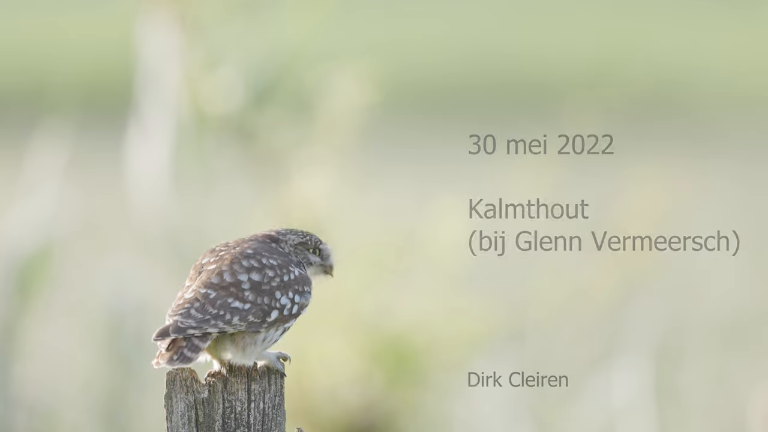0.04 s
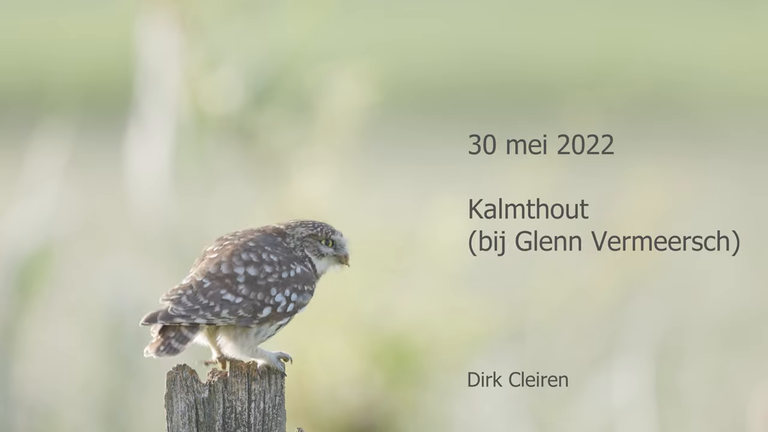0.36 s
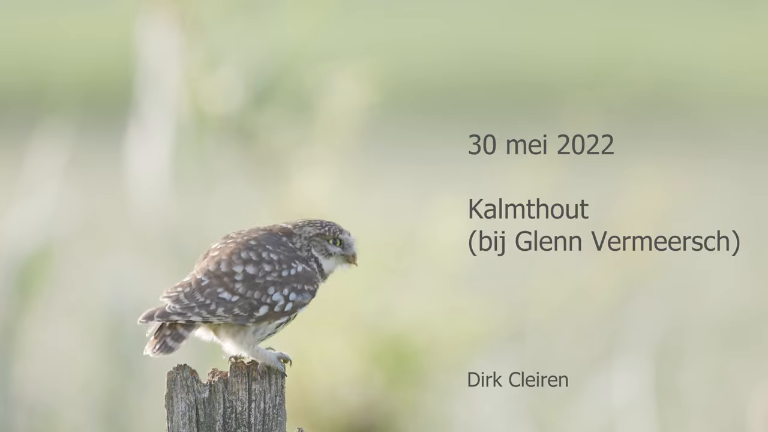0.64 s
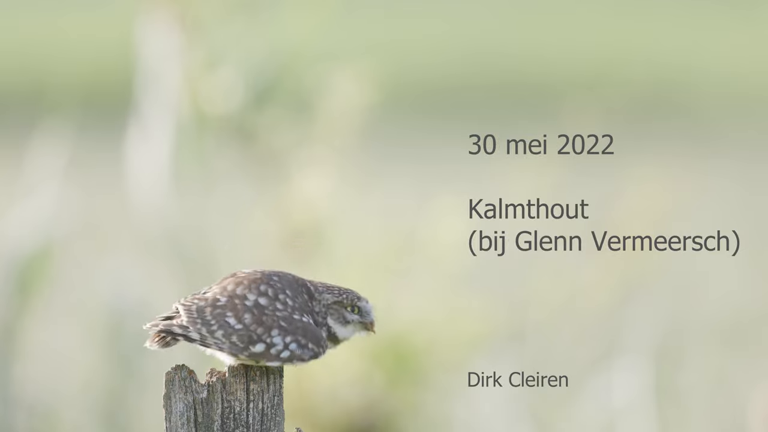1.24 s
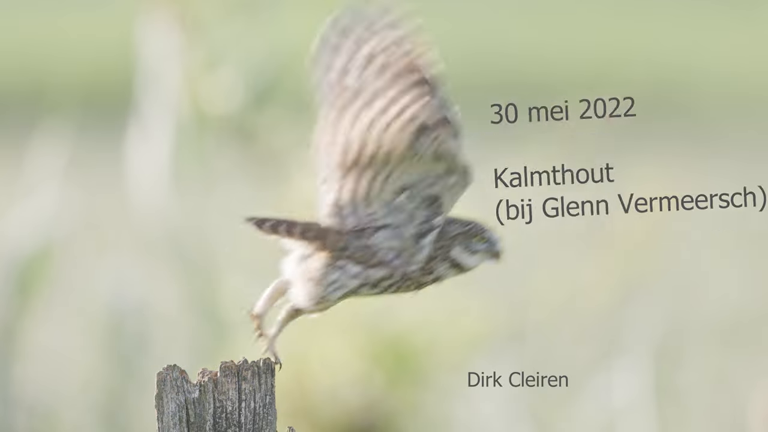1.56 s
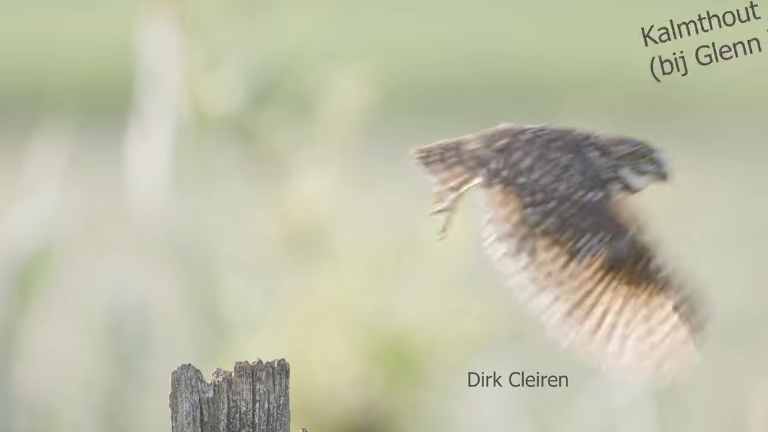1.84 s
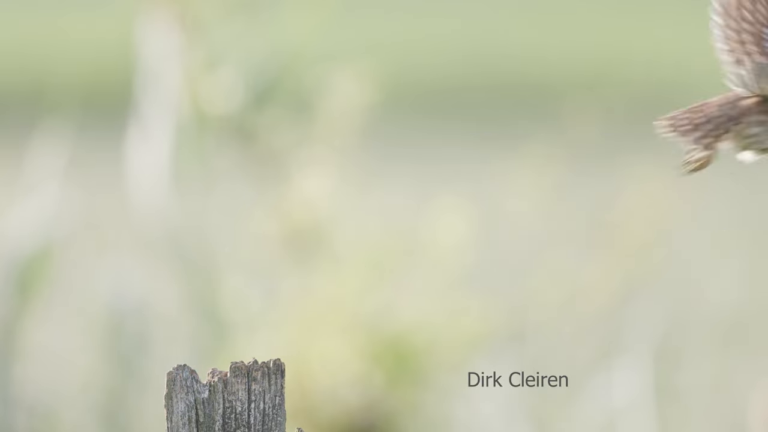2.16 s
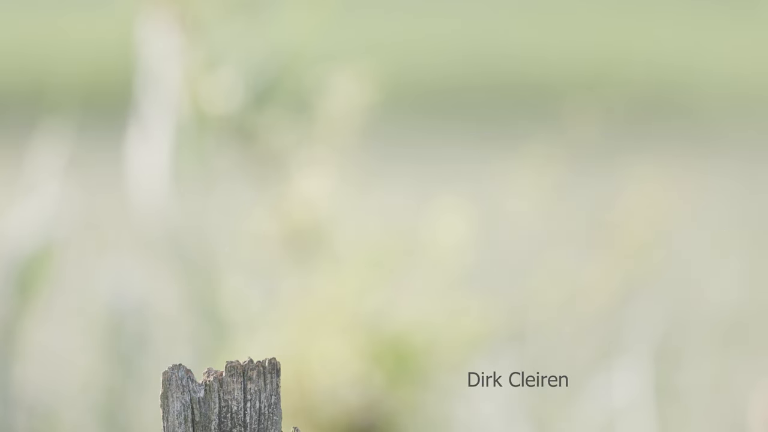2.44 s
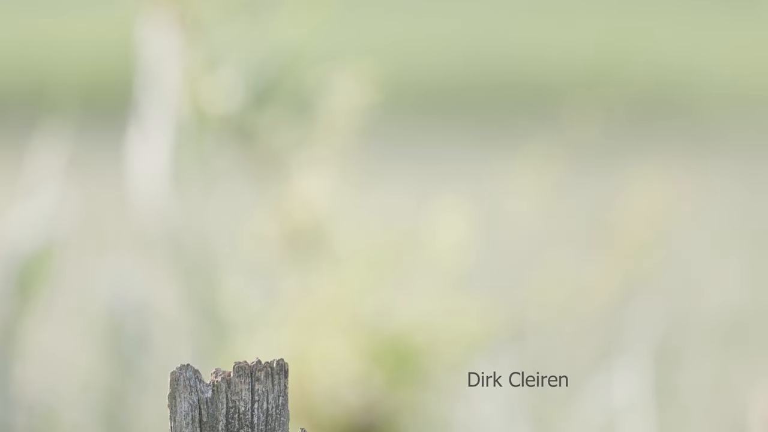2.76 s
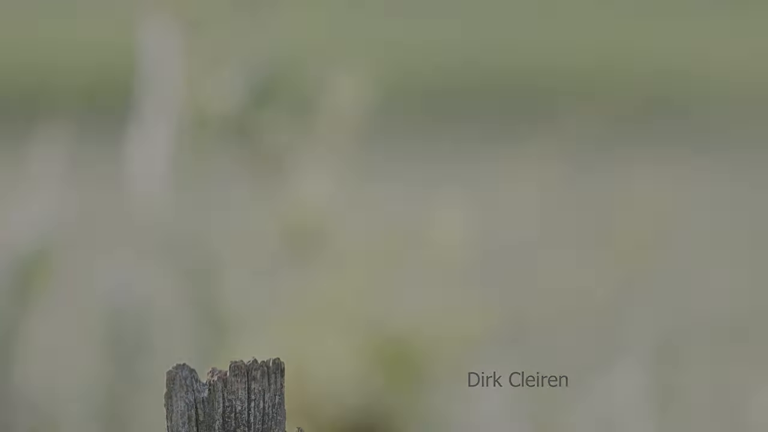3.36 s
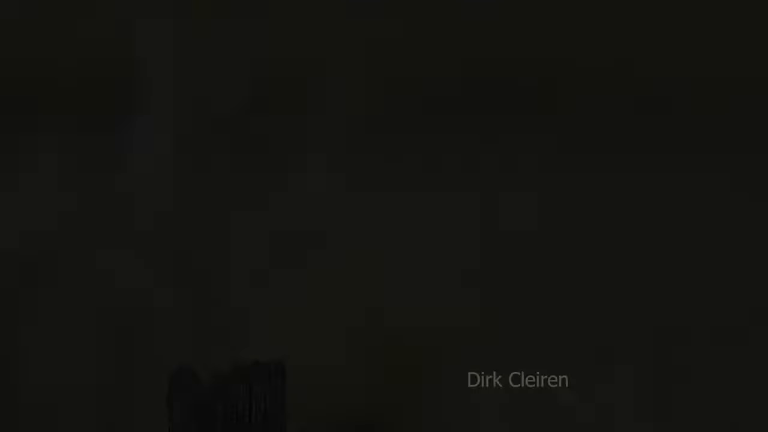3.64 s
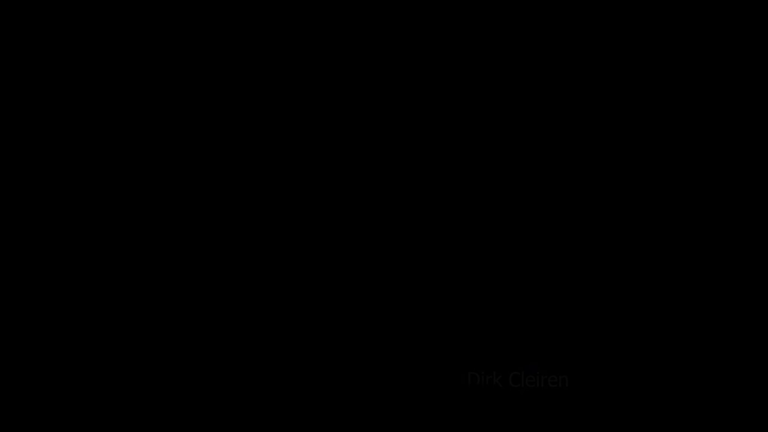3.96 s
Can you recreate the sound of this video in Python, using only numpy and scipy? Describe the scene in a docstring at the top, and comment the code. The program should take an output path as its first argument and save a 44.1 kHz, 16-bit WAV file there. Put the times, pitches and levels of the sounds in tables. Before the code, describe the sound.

Soft, repeated hooting bird calls across a meadow, with brief wing flaps and a deep hum.

```python
"""Distant birds call back and forth in soft, arched hoots near 1.2 kHz, across an open meadow.
Slurred and level notes sound between; all are nearly pure tones, echoed by the field.
A small owl flaps off a fence post with puffs of air and feather rustle, and a smaller bird chirps twice.
A few dull taps sound here and there. Under it all lie a deep steady hum, a far rumble and faint hiss;
everything fades out at the end."""
import sys
import numpy as np
from scipy import signal
from scipy.fft import rfft, irfft
from scipy.io import wavfile

SR = 44100
rng = np.random.default_rng(int(sys.argv[2]) if len(sys.argv) > 2 else 0)


def int16_out(signal):
    """Quantize to a 16-bit WAV file."""
    q = np.round(np.clip(np.atleast_2d(signal).T, -1, 1) * 32767)
    wavfile.write(sys.argv[1], SR, q.astype(np.int16))


N = 176400
TIME = np.arange(N) / SR

# arched hoots: (start [s], length [s], top pitch [Hz], arch depth [Hz], level [dB])
HOOT_NOTES = [(.088, 0.074, 1210, 101, -50.5), (0.215, 0.11, 1230, 150, -53), (.38, 0.088, 1189, 122, -53),
              (0.579, .115, 1235, 215, -49.5), (0.793, 0.12, 1226, 202.5, -49),
              (0.995, 0.11, 1210, 161, -46.5), (1.177, 0.098, 1216, 158, -48.5),
              (1.343, 0.092, 1206, 153, -47), (1.536, 0.09, 1204, 123, -43),
              (1.757, 0.096, 1218, 125, -42.5), (1.955, 0.103, 1194, 182, -42.5),
              (2.121, 0.11, 1193, 171.5, -43.5), (2.301, 0.096, 1161, 160, -43.5),
              (3.712, 0.1015, 1193, 157, -42.5), (3.893, 0.11, 1207, 108, -44)]


def hoots():
    """Each hoot rises in one arch and falls back less far than it rose."""
    fall_share = 0.82
    arches = [(start, length, top - depth, top, top - fall_share * depth, db)
              for start, length, top, depth, db in HOOT_NOTES]
    return sing(arches, attack_s=0.03, release_s=0.019,
                waver_share=0.0083, flutter_db=1.62, drift_hz=66, skew=0.98)


# slurred calls, one curve each: (time [s], pitch [Hz], level [dB])
SLUR_CURVES = [
    [(.772, 1155, -58), (.79, 1320, -59), (.81, 1476, -54.5), (.835, 1459, -53), (.86, 1262, -53),
     (.885, 1200, -58)],
    [(.912, 1031, -53.5), (.955, 1234, -46), (.98, 1283, -47), (1.0, 1352, -44), (1.028, 1557, -57),
     (1.055, 1400, -62)],
    [(1.492, 1680, -61), (1.51, 1420, -60), (1.53, 1287, -50.5), (1.57, 1210, -56)],
    [(1.998, 1216, -56), (2.028, 1450, -59), (2.055, 1394, -52), (2.09, 1167, -52)],
    [(2.078, 1164, -48.5), (2.12, 1200, -43.5), (2.15, 1230, -49.5), (2.19, 1402, -48.5),
     (2.215, 1280, -59)],
    [(3.286, 1027, -49), (3.3, 1092, -49), (3.315, 1396, -63), (3.33, 1463, -60), (3.352, 1347, -49.5),
     (3.38, 1127, -48), (3.41, 920, -54)],
    [(3.438, 1064, -43.5), (3.46, 1136, -42), (3.505, 1227, -42), (3.525, 1276, -43), (3.548, 1315, -42.5),
     (3.575, 1450, -52), (3.61, 1564, -53)],
]


def slurs():
    """Wide, slightly rough glides, each sung in one breath."""
    waver_share, flutter_db, drift_hz = 0.014, 1.5, 130
    out, waver, flutter = np.zeros(N), drift(drift_hz), drift(drift_hz)
    for call in SLUR_CURVES:
        times, hz, db = np.transpose(call)
        on = (TIME >= times[0]) & (TIME < times[-1])
        pitch_hz = np.interp(TIME[on], times, hz) * (1 + waver_share * waver[on])
        level_db = np.interp(TIME[on], times, db) + flutter_db * flutter[on]
        out[on] += voice(pitch_hz, level_db, TIME[on] - times[0], attack_s=0.005, release_s=0.016)
    return out


# whistles: (start [s], length [s], first pitch [Hz], middle pitch [Hz], last pitch [Hz], level [dB])
WHISTLE_NOTES = [(-.02, 0.11, 1167, 1168, 1130, -53), (.305, 0.13, 1163, 1154, 1140, -56),
                 (.5, 0.075, 1525, 1553, 1500, -64), (1.2, 0.083, 1510, 1540, 1520, -62),
                 (1.63, 0.17, 1180, 1172, 1175, -52.5), (1.855, 0.085, 1505, 1530, 1505, -61),
                 (2.215, 0.053, 1170, 1166, 1175, -59), (2.385, 0.18, 1172, 1190, 1150, -61),
                 (2.48, 0.068, 1854, 1805, 1816, -67), (2.555, 0.087, 1428, 1467, 1505, -69),
                 (2.635, 0.074, 1540, 1540, 1530, -65), (2.645, 0.061, 1144, 1170, 1160, -62.5),
                 (3.425, 0.2, 1530, 1620, 1573, -60.5), (3.455, .062, 2070, 2200, 2320, -67),
                 (3.555, 0.18, 1235, 1162, 1160, -49.5)]


def whistles():
    """Birds near and far hold almost level notes; a faint one near 2.65 s is an echo of an earlier call."""
    return sing(WHISTLE_NOTES, attack_s=0.02, release_s=0.013,
                waver_share=0.0051, flutter_db=2, drift_hz=66)


# chirps: (start [s], length [s], first pitch [Hz], middle pitch [Hz], last pitch [Hz], level [dB])
CHIRP_NOTES = [(2.69, 0.014, 1860, 2260, 2500, -61), (2.729, 0.021, 1730, 2317, 2420, -56.5),
               (2.727, .018, 2500, 2630, 2640, -66), (2.755, 0.015, 1750, 2070, 2220, -60),
               (2.754, 0.014, 2450, 2390, 2350, -59), (2.844, 0.0136, 1830, 2400, 3120, -67),
               (2.857, .02, 1760, 2370, 2600, -56), (2.875, 0.035, 2890, 2974, 2920, -63),
               (2.907, 0.023, 2800, 2800, 2900, -58), (2.927, 0.0166, 1900, 2160, 2270, -54.5),
               (2.928, 0.02, 2600, 2570, 2540, -62), (2.949, 0.0081, 1880, 2040, 2270, -66)]


def chirps():
    """A smaller bird sings two clusters of quick, raspy, mostly rising notes."""
    return sing(CHIRP_NOTES, attack_s=0.0037, release_s=0.003,
                waver_share=0.02, flutter_db=4, drift_hz=310)


# hoarse moments: (centre [s], half length [s], level [dB])
RASP_BURSTS = [(0.784, 0.008, -52.5), (.83, .025, -58.5), (1.033, .02, -55.5), (1.535, 0.012, -55),
               (3.298, 0.0066, -50), (3.431, 0.0084, -50), (3.717, 0.0061, -45.5)]
# rasp spectrum: (frequency [Hz], density [dB])
RASP_SPECTRUM = [(600, -28), (900, -5), (1050, 13), (1220, -20), (1400, -6), (2200, -19), (5000, -52)]


def rasps():
    """Some calls turn hoarse: brief narrow-band noise near their pitch."""
    return swells(RASP_BURSTS) * noise(RASP_SPECTRUM)


# wing strokes: (centre [s], half length [s], puff [dB], rustle [dB])
WING_STROKES = [(1.155, 0.028, -55.5, -72), (1.498, .009, -61, -65), (1.563, 0.045, -56, -63.5),
                (1.731, 0.0074, -56, -61), (1.75, 0.013, -53.5, -76), (1.838, 0.023, -60.5, -61),
                (1.992, 0.063, -56.5, -63.5)]
# air puff, feather rustle and downstroke spectra: (frequency [Hz], density [dB])
PUFF_SPECTRUM = [(100, -27), (200, -16.5), (350, -3), (500, -5), (800, -4), (1100, -7), (1500, -15),
                 (3000, -21), (12000, -45)]
RUSTLE_SPECTRUM = [(300, -19), (1200, 4), (2100, 9), (3200, -7.5), (6000, -12), (12000, -35.5)]
THUMP_SPECTRUM = [(100, -18), (172, 3.5), (260, -7), (400, -13.5), (900, -43), (10000, -80)]


def owl_wings():
    """Each stroke pushes a soft puff of air and brushes the feathers; the first full one also thumps."""
    thump = swell(centre_s=1.772, half_s=0.04, db=-44.5) * noise(THUMP_SPECTRUM)
    puff = swells(WING_STROKES) * noise(PUFF_SPECTRUM)
    rustle = swells(WING_STROKES, db_column=3) * noise(RUSTLE_SPECTRUM)
    flicker_db = 2 * drift(70)
    return puff + rustle * from_db(flicker_db) + thump


# taps: (centre [s], half length [s], body [dB], brush [dB])
TAP_HITS = [(1.025, .008, -58, -77), (1.546, .005, -51, -70), (1.718, 0.0069, -52, -74),
            (2.205, 0.0089, -55, -72), (2.396, 0.009, -49, -61), (2.872, 0.009, -54, -75),
            (2.964, 0.02, -55, -80), (3.066, 0.013, -52, -64), (3.166, 0.011, -57.5, -64),
            (3.536, .006, -50, -72), (3.73, 0.013, -51.5, -72)]
# tap body spectrum: (frequency [Hz], density [dB])
TAP_SPECTRUM = [(100, -25), (350, -8), (550, -7.5), (800, 2), (1100, -11.5), (1500, -15), (3000, -21.5),
                (12000, -52)]


def taps():
    """Faint dull taps, some with a brush of treble."""
    body = swells(TAP_HITS) * noise(TAP_SPECTRUM)
    brush = swells(TAP_HITS, db_column=3) * noise(RUSTLE_SPECTRUM)
    return body + brush


def hum():
    """A deep tone, wavering slightly in pitch and level."""
    pitch_hz = 37.5 * (1 + 0.0024 * drift(5.5))
    level_db = -24.5 + drift(4.1)
    phase = 2 * np.pi * np.cumsum(pitch_hz) / SR
    return np.sqrt(2) * from_db(level_db) * np.sin(phase)


# rumble and hiss spectrum: (frequency [Hz], density [dB])
AIR_SPECTRUM = [(14, -2), (25, 0.5), (48, -1), (66, 0), (85, -7.5), (106, -5), (135, -14.5), (220, -19),
                (400, -25.5), (800, -30.5), (1600, -40.5), (2500, -42.5), (4500, -44), (10000, -47),
                (12000, -51)]


def air():
    """Steady far rumble and faint hiss."""
    return from_db(-38) * noise(AIR_SPECTRUM)


# field echoes: (delay [s], level [dB])
FIELD_ECHOES = [(0.019, -16.5), (0.057, -19.5), (0.111, -26.5)]


def field(x):
    """Open air: a thin scattered tail, a short smear from the grass and a few echoes."""
    tail = from_db(-15.5) * scatter(t60_s=0.58)
    grass = from_db(-15) * scatter(t60_s=0.098)
    response = tail + grass
    response[0] = 1  # direct sound
    for delay_s, db in FIELD_ECHOES:
        response[int(delay_s * SR)] += from_db(db)
    return signal.fftconvolve(x, response)[:N]


def sing(notes, attack_s, release_s, waver_share, flutter_db, drift_hz, skew=1):
    """Short notes; each bends through three pitches, wavers and flutters a little."""
    out, waver, flutter = np.zeros(N), drift(drift_hz), drift(drift_hz)
    for start, length, first, middle, last, db in notes:
        on = (TIME >= start) & (TIME < start + length)
        t = TIME[on] - start
        progress = (t / length) ** skew
        glide_hz = first + (last - first) * progress
        arch_hz = (2 * middle - first - last) * 2 * progress * (1 - progress)
        pitch_hz = (glide_hz + arch_hz) * (1 + waver_share * waver[on])
        out[on] += voice(pitch_hz, db + flutter_db * flutter[on], t, attack_s, release_s)
    return out


def voice(hz, db, t, attack_s, release_s, octave_db=-34.5):
    """One nearly pure note with a faint octave, eased in and out."""
    phase = 2 * np.pi * (np.cumsum(hz) / SR + rng.random())
    tone = np.sin(phase) + from_db(octave_db) * np.sin(2 * phase)
    attack = np.sin(np.pi / 2 * np.minimum(t / attack_s, 1))
    release = np.sin(np.pi / 2 * np.minimum((t[-1] - t) / release_s, 1))
    return np.sqrt(2) * from_db(db) * attack * release * tone


def swell(centre_s, half_s, db):
    """A bell-shaped rise and fall in level."""
    return from_db(db) * np.exp(-0.5 * ((TIME - centre_s) / half_s) ** 2)


def swells(rows, db_column=2):
    """An envelope with one swell per row."""
    return sum(swell(row[0], row[1], row[db_column]) for row in rows)


def noise(spectrum):
    """Steady noise of the given colour, rms 1."""
    hz, db = np.transpose(spectrum)
    bins_hz = np.maximum(np.fft.rfftfreq(N, 1 / SR), 1)
    colour = from_db(np.interp(np.log(bins_hz), np.log(hz), db))
    low_cut = np.minimum(bins_hz / hz[0], 1) ** 2
    return rms_one(irfft(rfft(rng.standard_normal(N)) * colour * low_cut, N))


def drift(rate_hz):
    """Smooth random motion of spread 1."""
    hop, settle = 40, 2000
    pole = np.exp(-2 * np.pi * rate_hz * hop / SR)
    white = rng.standard_normal(N // hop + settle + 2)
    slow = signal.lfilter([1], [1, -2 * pole, pole * pole], white)[settle:]
    return np.interp(np.arange(N) / hop, np.arange(len(slow)), rms_one(slow))


def scatter(t60_s):
    """One second of dying reflections, of energy 1."""
    tail = rng.standard_normal(SR) * from_db(-60 * TIME[:SR] / t60_s)
    return tail / np.sqrt(np.sum(tail ** 2))


def from_db(db):
    """Decibels to gain."""
    return 10 ** (np.asarray(db) / 20)


def rms_one(x):
    """Scale to rms 1."""
    return x / np.sqrt(np.mean(x ** 2) + 1e-20)


def scene():
    """The meadow, in mono; only the bird calls echo."""
    birds = hoots() + whistles() + chirps() + rasps() + slurs()
    return (field(birds) + owl_wings() + taps() + hum() + air())[None]


# overall gain, steady until the closing fade: (time [s], gain [dB])
FADE_CURVE = [(3.32, -4.5), (3.5, -10), (3.7, -17), (3.8, -21), (3.9, -27), (4.0, -38.5)]


def record(dry):
    """The level fades out and the top is cut."""
    cutoff_hz = 11200
    gain_db = np.interp(TIME, *np.transpose(FADE_CURVE))
    lowpass = signal.butter(24, cutoff_hz, fs=SR, output="sos")
    return signal.sosfilt(lowpass, dry * from_db(gain_db))


dry = scene()
out = record(dry)
int16_out(out)
```